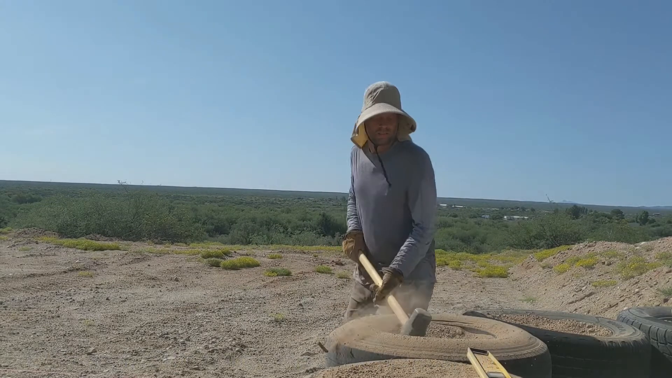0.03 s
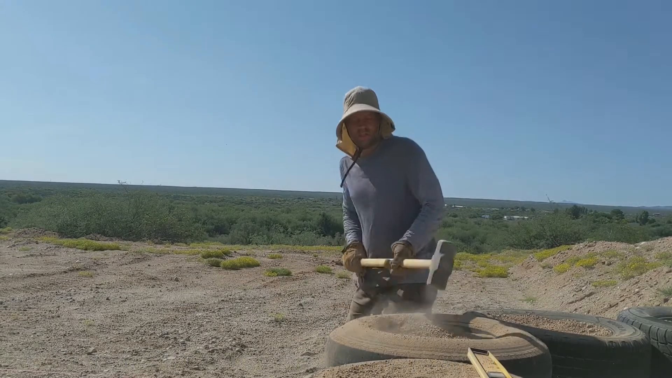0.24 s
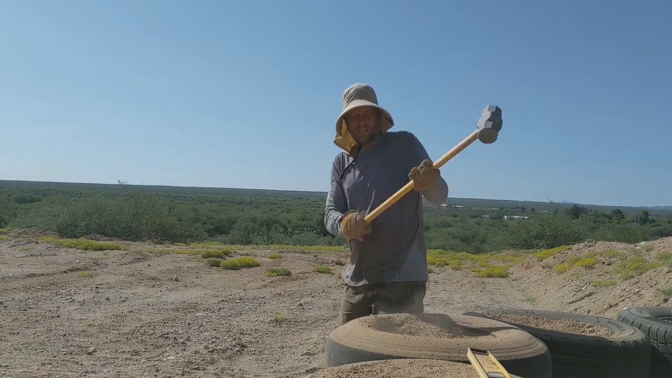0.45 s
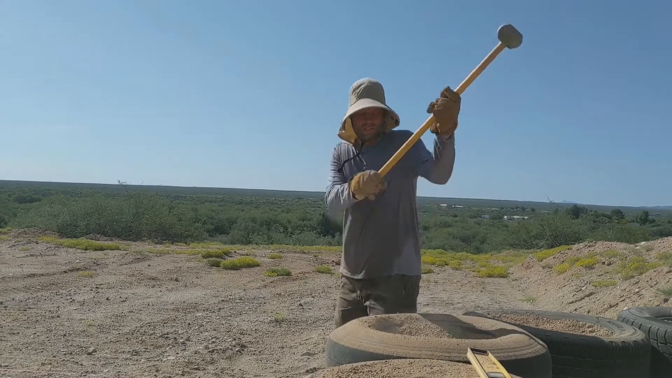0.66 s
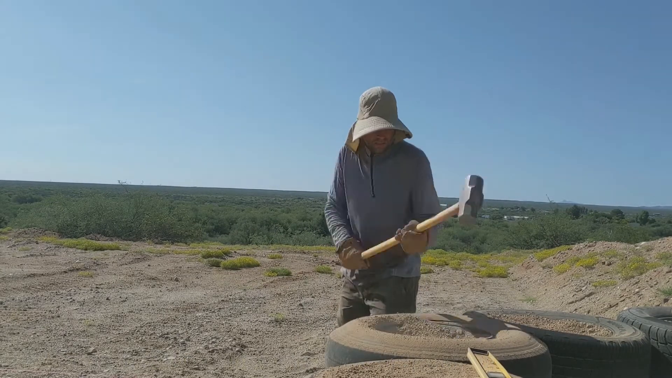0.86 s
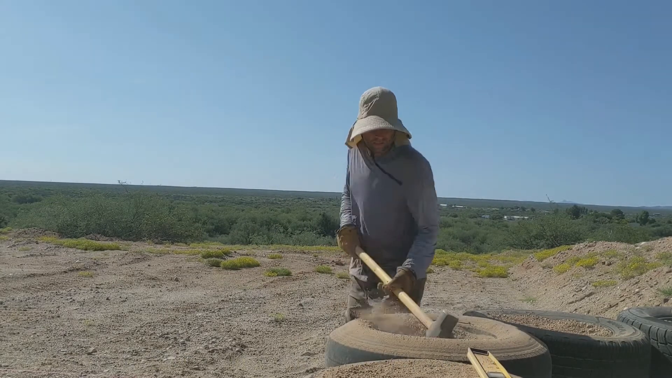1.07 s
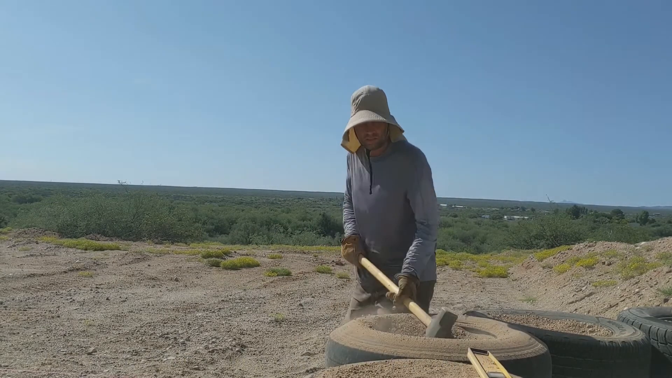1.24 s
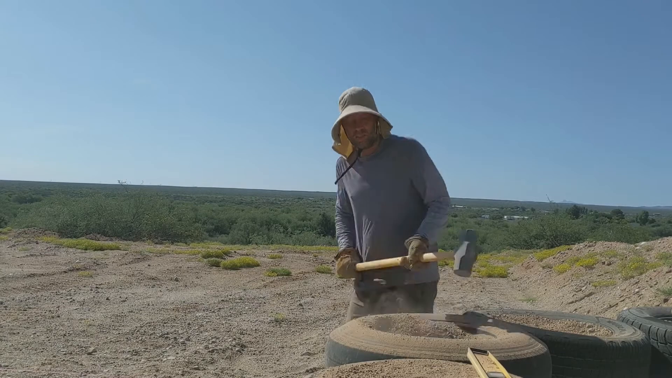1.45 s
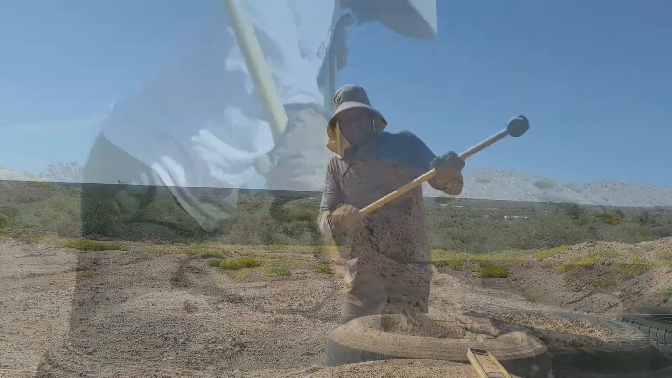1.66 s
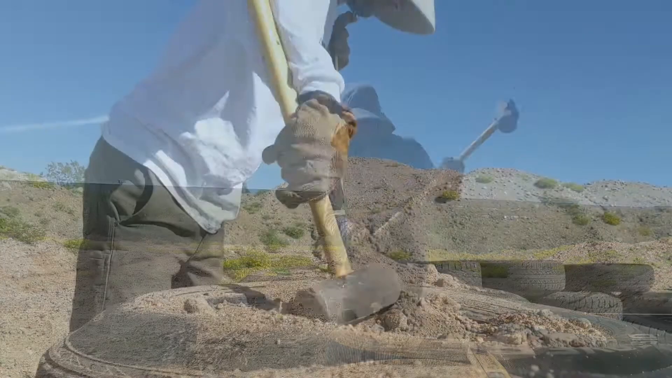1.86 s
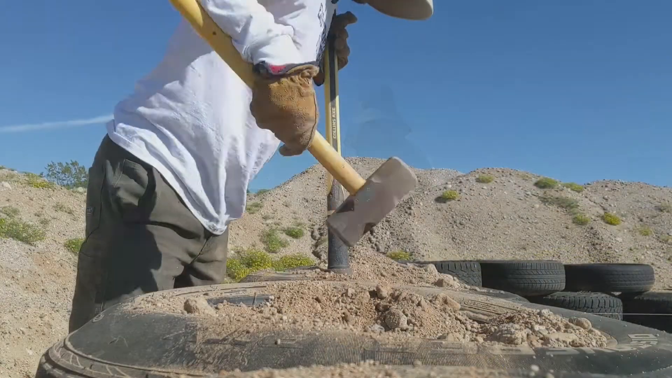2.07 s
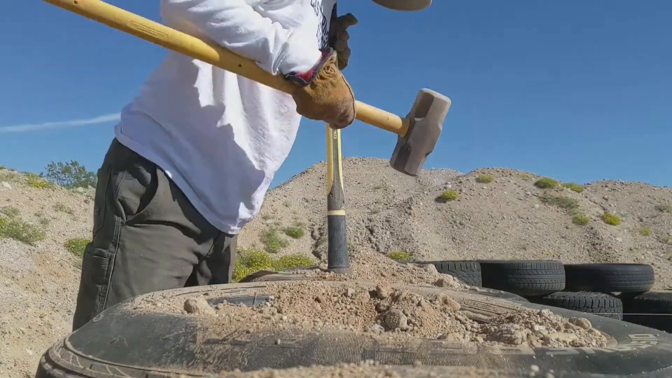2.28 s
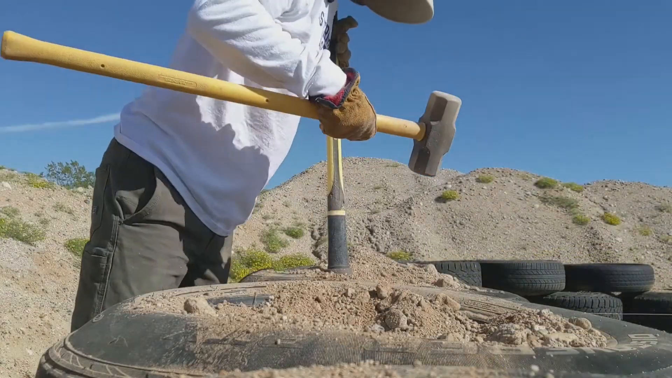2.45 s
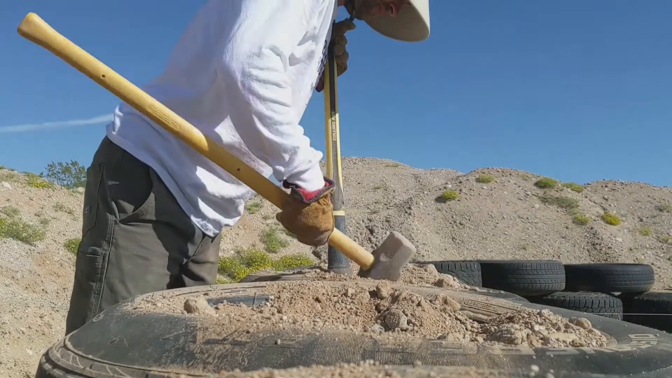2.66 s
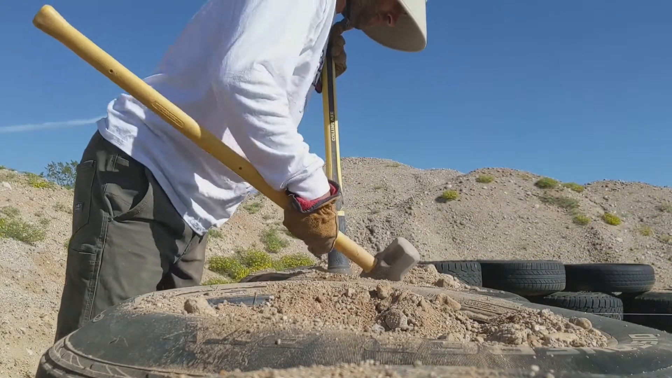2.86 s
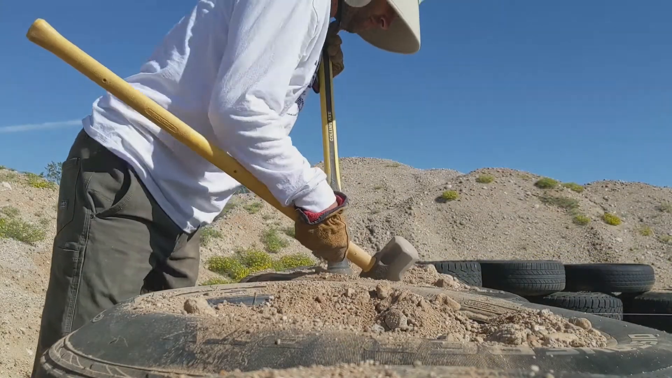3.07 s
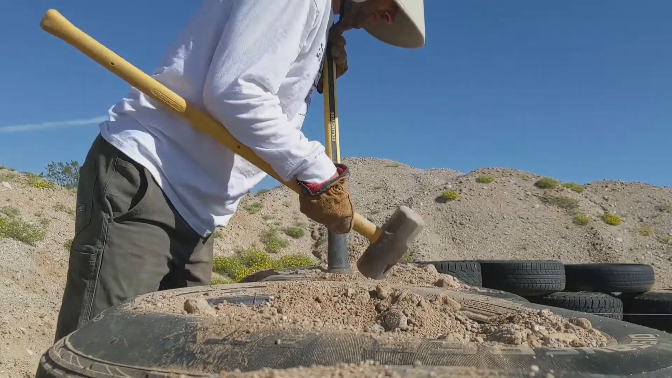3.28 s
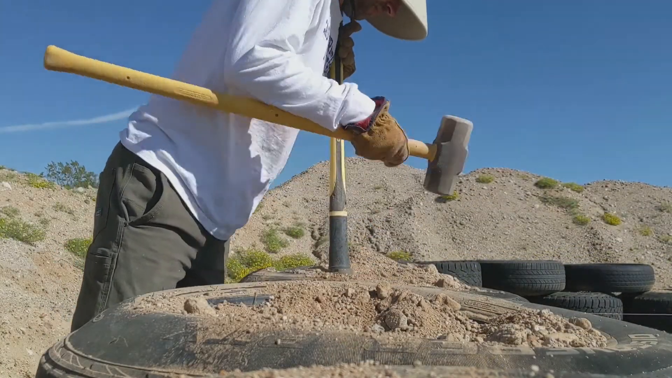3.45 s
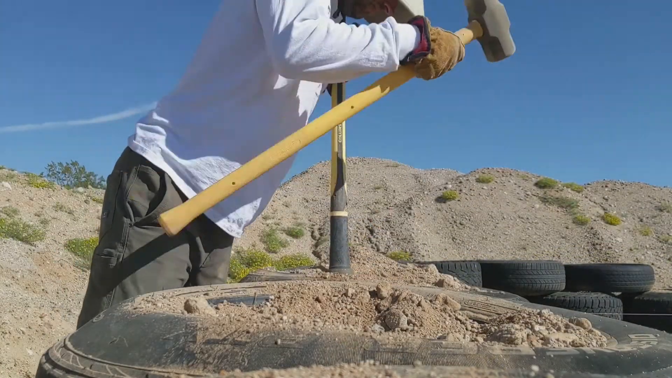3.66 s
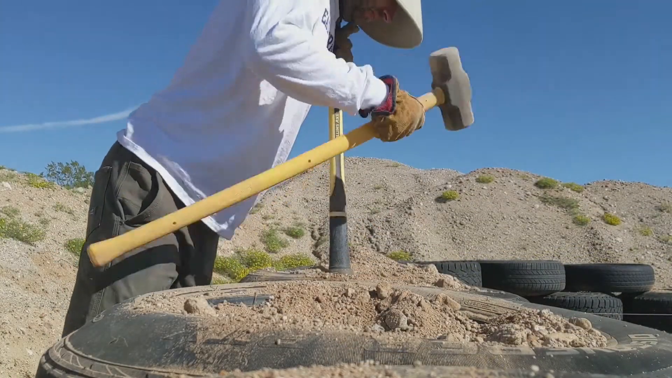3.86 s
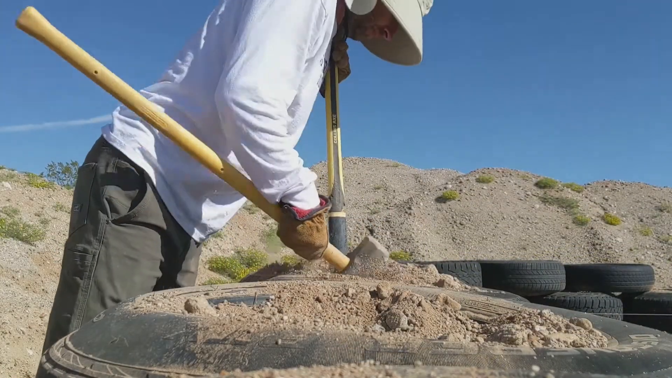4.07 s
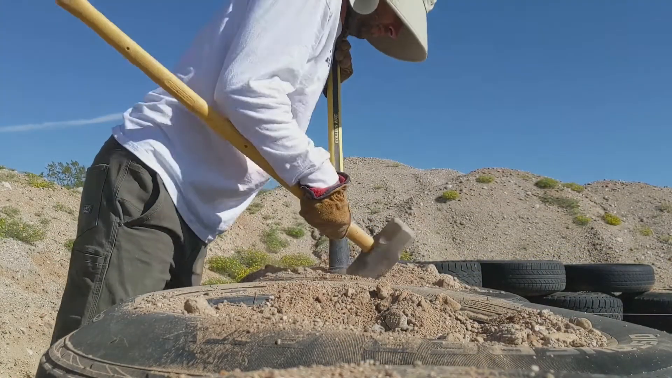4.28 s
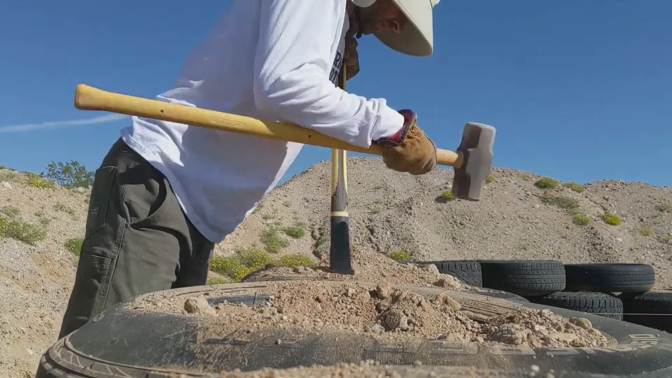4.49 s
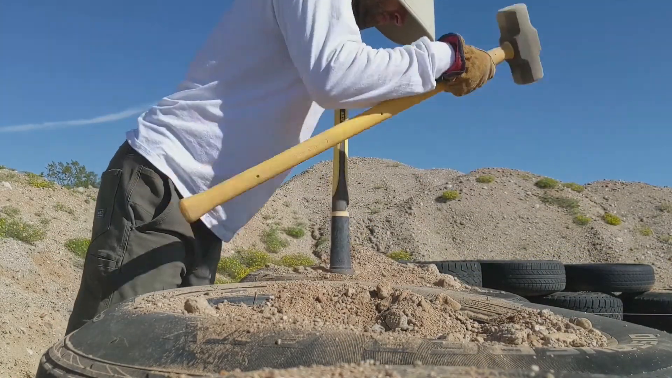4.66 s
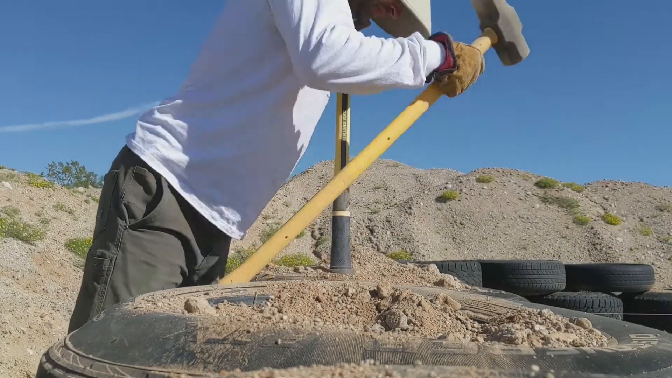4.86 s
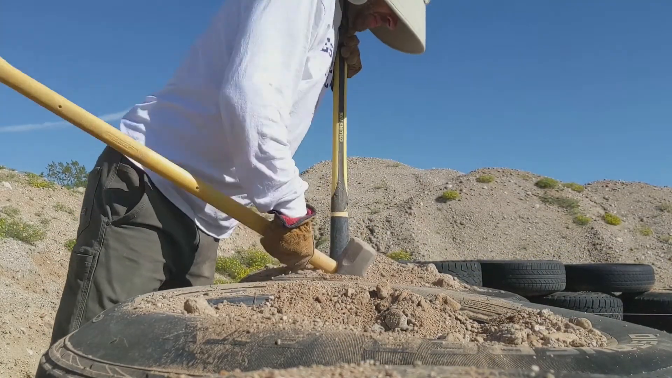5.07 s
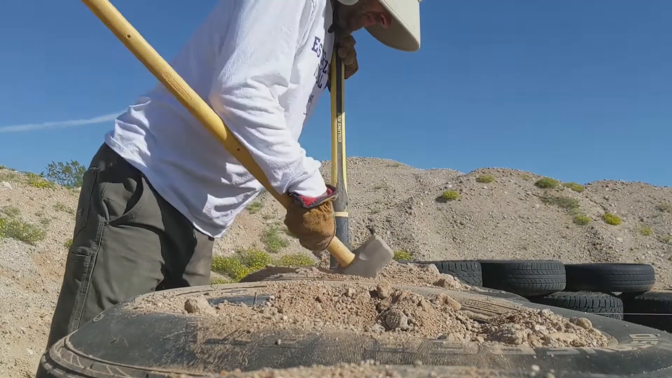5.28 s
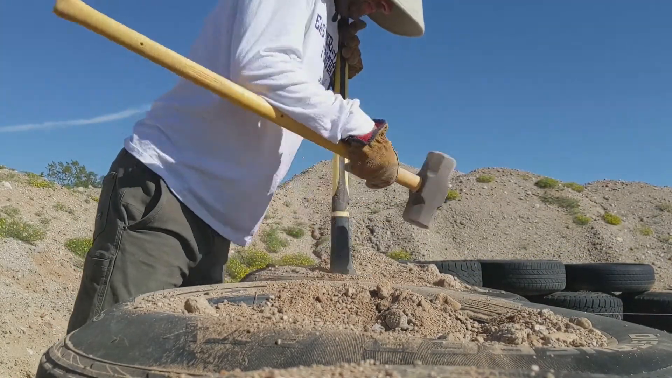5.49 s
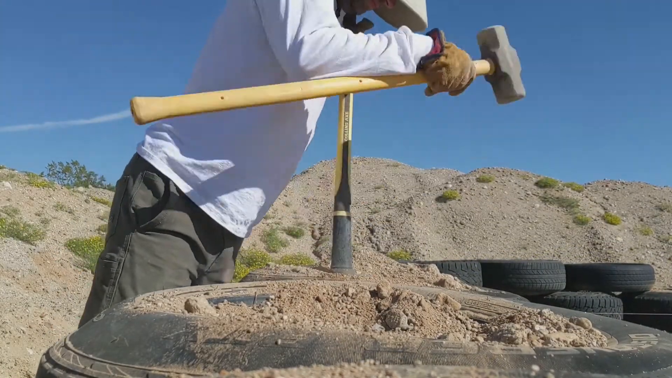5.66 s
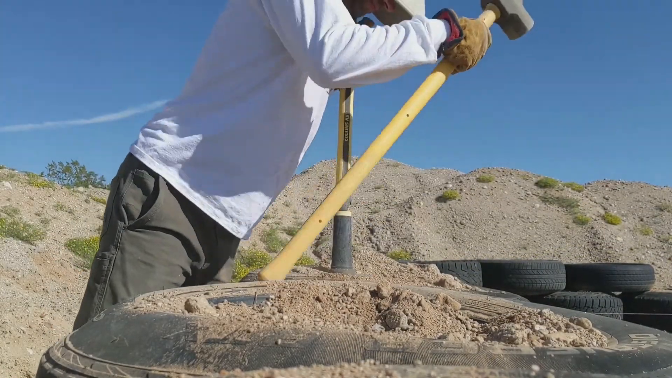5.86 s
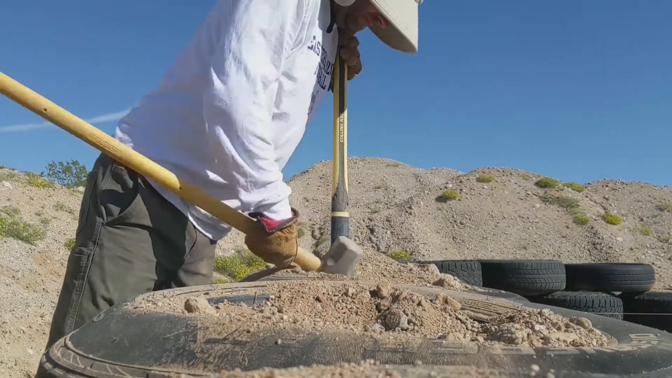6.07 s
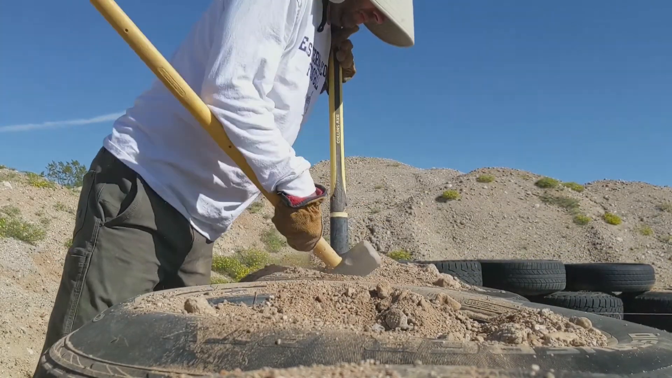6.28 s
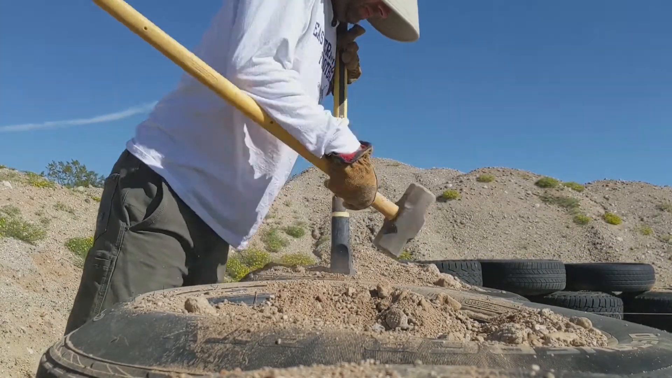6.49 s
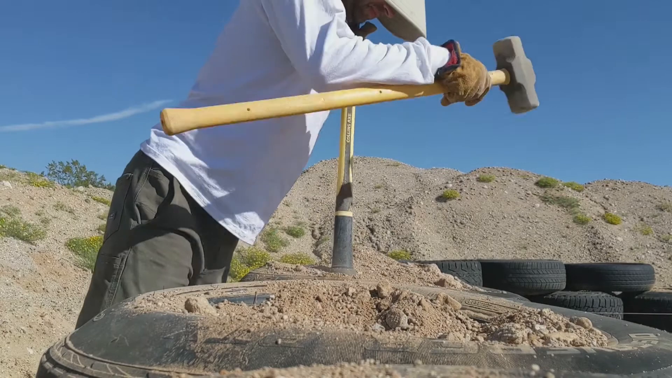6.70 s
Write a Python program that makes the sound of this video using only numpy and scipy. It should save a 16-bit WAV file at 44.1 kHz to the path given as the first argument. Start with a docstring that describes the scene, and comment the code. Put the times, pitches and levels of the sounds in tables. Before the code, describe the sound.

Outdoors, breeze rumbles softly on the microphone and a far engine drones low, with a few dull clods dropping in the first 0.7 s. At 1.0 s a sledgehammer lands on earth packed in a tyre: a deep, short, muffled thump. Around 1.75-2.1 s the engine disappears and the breeze drops; faint high whistles of a bird and small pebble knocks appear. Closer blows follow at 2.7, 4.0, 5.1 and 6.1 s. The first is a hard, dry stony knock with little boom; the next is sharp with weight beneath; the last two are full, deep thuds with gritty crunch. Soft hammer rebounds, crumbling dirt and pebble ticks follow them, while sleeves scuff and a glove hisses along the handle. Low, faint bird whistles return from 5.8 s. Blows are brighter at right, dry, without echo, over quiet distant site noise and hiss until 6.7 s.

```python
"""Sledgehammer ramming earth into tyres

Each blow crunches grit as filtered noise and rings stones, packed tyre, ground and steel head as decaying modes.
Clods and pebbles tick, cloth and glove rustle as shaped noise, and a bird whistles in gliding sines.
Breeze and a far engine's drone fade early, over far-off site noise and microphone hiss.
"""
import sys
import numpy as np
from scipy import signal
from scipy.fft import rfft, irfft, next_fast_len
from scipy.io import wavfile
from scipy.ndimage import uniform_filter1d

SR = 44100
rng = np.random.default_rng(int(sys.argv[2]) if len(sys.argv) > 2 else 0)


def bounce(signal):
    """Save signal as a 16-bit WAV file at the path given by the first command-line argument."""
    frames = np.transpose(np.atleast_2d(signal))
    limited = np.clip(frames, -1, 1)
    pcm = np.round(limited * 32767).astype(np.int16)
    wavfile.write(sys.argv[1], SR, pcm)


N = 296793  # samples

# Hammer blows: start_s, contact_ms, touch_ahead_ms, touch_db, ground_late_ms, ground_db, fill_db, tyre_db,
# stone_db, steel_db, steel_t60_s, grit_db, spray_db
BLOWS = [(1.0092, 0.76, 2.5, -67, 28, -29, -29.5, -24.5, -35.5, -70, .04, -51, -57),
         (2.6958, 0.39, 1.22, -19.5, 57.3, -39.5, -48.5, -35, -20, -34.5, 0.06, -47.5, -72),
         (4.0217, 0.38, 6.7, -50, 35, -38.5, -26, -44, -14, -68, .05, -41, -71.5),
         (5.0996, 1.2, 4.1, -27.5, 24, -28.5, -24.5, -24, -21.5, -38.5, 0.024, -47, -76),
         (6.1224, 0.92, 3.1, -27, 22, -30.5, -23, -21.5, -36, -34, 0.038, -46, -35)]


def blows():
    """Impact excitation: the head touches loose grit first, then pushes on everything that rings."""
    out, t = np.zeros(N), np.arange(N) / SR
    loose, crunch = loose_earth(), grit_noise(0.88, 0.83, 3800, 4000)
    spray, bands = grit_noise(0.1, 0.7, 11000, 7000), settling_bands()
    for (start, contact_ms, ahead_ms, touch_db, late_ms, ground_db, fill_db, tyre_db,
         stone_db, steel_db, steel_t60, grit_db, spray_db) in BLOWS:
        near = slice(int((start - .02) * SR), int((start + .6) * SR))
        since = t[near] - start
        early = since + ahead_ms / 1000
        # the struck face first moves away, so the pressure starts negative
        out[near] -= packed_tyre(since, fill_db, tyre_db, contact_ms)
        out[near] -= stones(since, stone_db, contact_ms)
        out[near] += db_to_gain(fill_db - 7) * loose[near] * fade(since, .15)
        out[near] += ground(since, late_ms, ground_db)
        out[near] += steel_head(since, steel_db, steel_t60)
        out[near] -= db_to_gain(touch_db) * soften(pebble(early, 0.0043), .1)
        out[near] += db_to_gain(grit_db) * crunch[near] * fade(early, 0.051)
        out[near] += db_to_gain(spray_db) * spray[near] * fade(since, 0.023)
        out[near] += settling(since, [band[near] for band in bands], grit_db)
    return out


# Modes of the earth fill: pitch_hz, level_db, t60_s
FILL = [(92, 3.5, 0.052), (146.6, 0.33, 0.075)]
# Modes of the tyre: pitch_hz, level_db, t60_s
TYRE = [(243, -2, 0.055), (321, -5, 0.061), (510, -13.5, 0.018), (615, 7, 0.0067)]


def packed_tyre(since, fill_db, tyre_db, contact_ms):
    """Modal resonance: earth fill and tyre boom, with fewer highs the longer the contact lasts."""
    fill = db_to_gain(fill_db) * ring(FILL, since)
    tyre = db_to_gain(tyre_db) * ring(TYRE, since)
    return soften(fill + tyre, contact_ms)


# Modes of the stones: pitch_hz, level_db, t60_s
STONE = [(824, 7.5, 0.0096), (1286, 4, 0.01015), (1416, -10.5, 0.029), (2750, 5, 0.0073),
         (4210, -26.5, .015), (5800, -24.5, 0.018)]


def stones(since, level_db, contact_ms):
    """Radiation efficiency: stones ring, but are too small to radiate bass."""
    small = signal.butter(2, 450, "high", fs=SR)
    return soften(db_to_gain(level_db) * signal.lfilter(*small, ring(STONE, since)), contact_ms)


# Modes of the ground: pitch_hz, level_db, t60_s
GROUND = [(29, 0, .13), (42, 0, .08), (64, -2, .1)]


def ground(since, late_ms, level_db):
    """Damped oscillation: the ground gives 8 ms after the blow, then swings harder later."""
    first = db_to_gain(-4.5) * ring(GROUND, since - 0.008)
    main = ring(GROUND, since - late_ms / 1000)
    return soften(db_to_gain(level_db) * (first + main), 14)


# Modes of the steel head: pitch_hz, level_db
STEEL = [(7110, -27), (8770, -13), (11370, -4.5), (12100, -18)]


def steel_head(since, level_db, t60):
    """Modal resonance: high steel modes share one decay and build up over 2.9 ms."""
    modes = [(*mode, t60) for mode in STEEL]
    return db_to_gain(level_db) * ring(modes, since) * np.clip(since / 0.0029, 0, 1)


def grit_noise(share, spread_db, hz, width):
    """Granular noise: collisions of uneven grains fill one broad band."""
    return unit(shape(grains(share, spread_db), peak(hz, width) ** 2))


def loose_earth():
    """Granular friction: the loose part of the fill shifts as low noise."""
    return grit_noise(0.072, 3, 150, 160)


# Bands of thrown earth: pitch_hz, level_db (re the blow's grit), t60_s
SETTLE = [(496, 9.5, 0.056), (1132, 1.5, 0.13), (2200, -13, 0.054), (3800, 0.5, 0.081), (7880, -18, 0.037),
          (13070, -26, 0.074)]


def settling_bands():
    """Granular noise: one band of grain collisions for each row of thrown earth."""
    return [grit_noise(0.22, 3.4, hz, 0.67 * hz) for hz, _, _ in SETTLE]


def settling(since, bands, grit_db):
    """Frequency-dependent decay: each band of thrown earth dies away at its own rate."""
    return sum(db_to_gain(grit_db + db) * band * fade(since, t60)
               for band, (_, db, t60) in zip(bands, SETTLE))


# Soft bounces of head and tyre: start_s, fill_db, tyre_db
BOUNCES = [(2.098, -54, -44), (2.795, -52, -70), (2.871, -56, -73), (3.449, -71, -41.5), (3.956, -75, -41),
           (4.114, -43, -56), (4.217, -48.5, -48), (4.351, -71.5, -45), (5.197, -48, -66),
           (5.299, -44.5, -75), (5.343, -51, -48), (6.213, -46.5, -57.5), (6.327, -46, -67),
           (6.382, -54, -71), (6.429, -50, -63)]


def bounces():
    """Elastic rebound: head and tyre bounce back softly, ringing the fill and tyre modes again."""
    out, t, loose = np.zeros(N), np.arange(N) / SR, loose_earth()
    for start, fill_db, tyre_db in BOUNCES:
        near = slice(int((start - .02) * SR), int((start + .2) * SR))
        since = t[near] - start
        out[near] -= packed_tyre(since, fill_db, tyre_db, contact_ms=4.8)
        out[near] -= db_to_gain(fill_db - 14.5) * loose[near] * fade(since, 0.27)
    return out


# Spectral shading of the left channel, which faces away from the work: pitch_hz, left_minus_right_db
SHADE = [(60, -.5), (200, -2.5), (400, -5.5), (700, -4), (1300, -1.5), (2400, -1.5), (4400, -8),
         (8000, -11), (11500, -19), (15000, -19)]
# Phase lag of the left channel: pitch_hz, lag_rad
LEFT_LAG = [(60, .05), (300, .6), (600, 0.4), (1300, .05), (2300, .05), (4000, 2.38), (16000, 11.7)]


def place_hits(hits):
    """Interaural-style cues: the blows reach the left duller and with a phase lag."""
    shade, lag = along(SHADE), np.exp(-1j * along(LEFT_LAG))
    left = shape(hits, db_to_gain(shade / 2) * lag)
    right = shape(hits, db_to_gain(-shade / 2))
    return np.array([left, right])


# Modes of a clod: pitch_hz (before detuning), level_db, t60_share (of the tick's t60)
CLOD = [(320, 2.5, 0.31), (477, -11, 2.2), (675, 0, 0.76), (800, 9.5, 0.43)]


def clod(since):
    """Modal resonance: a clod thuds dully through a soft contact."""
    return soften(knock(CLOD, since, t60=0.042), 1.89)


# Modes of a pebble: pitch_hz (before detuning), level_db, t60_share (of the knock's t60)
PEBBLE = [(1050, -6, .6), (1350, -6, .5), (1750, -8, .45), (2400, -14, .3), (3200, -13, .3),
          (4400, -15, .25), (5500, -20, .2)]


def pebble(since, t60):
    """Modal resonance: a pebble knocks brighter than a clod."""
    return knock(PEBBLE, since, t60)


# Falling clods and pebbles: start_s, clod_db, pebble_db, grit_db, left_minus_right_db (clod and pebble)
TICKS = [(0.106, -62, -56, -76, 2), (0.138, -43.5, -54, -76, 4), (0.552, -45.5, -72, -72, -2),
         (0.579, -48, -52.5, -74, 9.5), (0.644, -40, -67, -74, -4), (1.3, -49.5, -61, -73, 1.5),
         (1.908, -68, -53, -73, -4), (1.984, -66, -46.5, -72, -2), (2.003, -70, -50, -72, -3),
         (2.098, -49, -41.5, -46, -2), (3.422, -52, -76, -73, -3), (3.489, -43, -41, -56, -3),
         (3.583, -47.5, -52.5, -60, 2), (4.121, -53, -55, -62, -8), (4.165, -48, -72, -71, -3),
         (4.581, -46, -54, -72.5, -6), (4.712, -61, -54, -73, -4), (5.274, -66, -49.5, -36.5, 1),
         (5.318, -44.5, -57, -72, 9), (5.77, -63, -59, -54, 2.5), (6.194, -63.5, -54.5, -69, -5),
         (6.325, -55, -48.5, -35.5, -4), (6.38, -80, -88, -43, -6), (6.507, -46, -62, -72, -3),
         (6.547, -46.5, -75, -73, 3), (6.627, -55, -48, -69, 1), (6.644, -62, -54.5, -71, 1)]


def ticks():
    """Superposed impacts: clod thuds, pebble knocks and grit clicks."""
    out, since = np.zeros((2, N + 4096)), np.arange(4096) / SR - .002
    for start, clod_db, pebble_db, grit_db, pan_db in np.vstack([TICKS, stray_ticks()]):
        dull = db_to_gain(clod_db) * clod(since)
        bright = db_to_gain(pebble_db) * soften(pebble(since, t60=0.042), .15)
        sharp = np.diff(rng.standard_normal(4096), prepend=0)  # differencing lifts the treble
        click = db_to_gain(grit_db) * sharp * fade(since, 0.0049)
        i = int((start - .002) * SR)
        out[:, i:i + 4096] += (dull + bright) * db_to_gain([[pan_db / 2], [-pan_db / 2]])
        out[:, i:i + 4096] += click * db_to_gain([[-10], [0]])
    return out[:, :N]


def stray_ticks(count=30):
    """Random point process: stray ticks fall at chance times, louder where something scuffs."""
    when = .01 + rng.random(count) * (N / SR - .02)
    luck = rng.standard_normal((count, 4))
    near_db = 20 * np.log10(scuff_gain()[(when * SR).astype(int)]) + 10.5
    levels_db = near_db[:, None] + [0, -11, -16] + 6.5 * luck[:, :3]  # clod, pebble, grit
    return np.column_stack([when, levels_db, 3 * luck[:, 3]])


# Scuffs of sleeves, boots and loose earth: start_s, hold_s, level_db
SCUFFS = [(.12, 0.068, -70), (.5, 0.099, -70.5), (1.89, 0.15, -64), (2.76, 0.27, -68.5), (3.38, 0.21, -67),
          (3.97, 0.14, -64), (4.15, 0.15, -67.5), (4.58, 0.35, -68), (4.92, .12, -64.5),
          (5.31, 0.014, -68.5), (5.62, 0.034, -71), (6.19, 0.55, -70), (6.53, 0.24, -65)]


def scuff_gain():
    """Amplitude envelope: scuffs rise, hold and fall away."""
    return swells(SCUFFS, rise_db_s=128, fall_db_s=86.5)


# Relative spectrum of the scuffs: pitch_hz, density_db_per_hz
SLEEVE = [(150, -7.5), (300, 1), (600, 8.5), (1200, -4), (1700, -6.5), (2100, -23.5), (3500, -11),
          (6000, -26)]


def scuffs():
    """Friction noise: rubbing surfaces catch and release as uneven grains."""
    mid, side = [unit(shape(grains(.05, 2.5), db_to_gain(along(SLEEVE)))) for _ in range(2)]
    pair = mid + 0.6 * side * np.array([[1], [-1]])
    return pair * scuff_gain() * db_to_gain(2.1 * walk(25))


# Relative spectrum of the glove: pitch_hz, width_hz, level_db
GLOVE = [(3270, 800, -1.5), (5510, 500, 4.5), (8000, 11000, -11.5), (11870, 880, -2.5), (14300, 1600, -15)]
# Slides of the glove along the handle: start_s, hold_s, level_db
SLIDES = [(1.75, 0.45, -84), (2.78, 0.3, -77.5), (3.27, 0.046, -83), (4.07, 0.11, -76),
          (4.66, 0.092, -74.5), (4.9, 0.11, -69)]


def glove():
    """Friction noise: the glove hisses along the handle, mostly at the right."""
    hiss = band_noise(GLOVE) * db_to_gain(0.4 * walk(20))
    rest = db_to_gain(-83)  # faint hiss throughout
    hiss = hiss * (rest + swells(SLIDES, rise_db_s=114, fall_db_s=134))
    return hiss * db_to_gain([[-12], [3]])


# Bird notes: start_s, length_s, first_pitch_hz, last_pitch_hz, level_db (mid-note, before panning)
BIRD = [(1.75, .14, 4630, 4580, -77.5), (1.85, .15, 4200, 3660, -76), (2.2, .075, 4080, 3900, -79.5),
        (5.77, .15, 1500, 1570, -79), (5.93, .18, 1720, 1520, -79), (6.31, .06, 1400, 1300, -77)]


def bird():
    """Frequency modulation: thin, unsteady whistles glide evenly and swell in the middle."""
    out, t = 0, np.arange(N) / SR
    for start, length, first_hz, last_hz, db in BIRD:
        part = np.clip((t - start) / length, 0, 1)
        hz = (first_hz + (last_hz - first_hz) * part) * (1 + .007 * walk(200))
        swell_db = -6 * (2 * part - 1) ** 2
        gain = (part > 0) * (part < 1) * db_to_gain(db + swell_db + 2 * walk(60))
        out = out + gain * np.sin(2 * np.pi * np.cumsum(hz) / SR)
    return out * db_to_gain([[-10], [1]])


# Relative spectrum of breeze and rumble: pitch_hz, density_db_per_hz
BREEZE = [(12, -7.5), (26, 12), (45, -7.5), (80, -17.5), (160, -24), (300, -58.5)]
# Breeze on the microphone: time_s, level_db
GUSTS = [(0.0, -45), (0.11, -49), (0.3, -47.5), (0.71, -51.5), (1.25, -48.5), (1.78, -52), (2.02, -60.5),
         (2.5, -63), (3.3, -63), (3.65, -66.5), (3.8, -59.5), (3.94, -69.5), (4.8, -70), (6.0, -71.5),
         (6.73, -66)]
# Ground rumbling on after blows: start_s, level_db
RUMBLES = [(2.8, -61), (4.09, -48), (5.2, -48.5), (6.2, -44)]


def breeze_and_rumble():
    """Low-frequency noise: buffeting breeze and ground rumble, nearly alike in both channels."""
    mid, side = [unit(shape(rng.standard_normal(N), db_to_gain(along(BREEZE)))) for _ in range(2)]
    pair = (mid + 0.14 * side * np.array([[1], [-1]])) * db_to_gain(0.74 * walk(2.3))
    rumble = swells([(s, 0, db) for s, db in RUMBLES], rise_db_s=150.5, fall_db_s=45)
    return pair * np.hypot(db_to_gain(curve(GUSTS)), rumble)


# Noise bands of the far engine: pitch_hz, width_hz, level_db (relative)
ENGINE = [(88, 10, -9), (157.9, 9, -6.5), (181.1, 10, -12), (281, 16, -14), (371, 14, -16),
          (609.5, 12, -18)]
# Steadier tones of the far engine: pitch_hz, level_db (re the noise bands)
HUM = [(89.5, -1.), (181., -2.5)]
# Fading of the far engine: time_s, level_db
DRONE = [(0, -65.5), (.8, -64.5), (1.6, -65), (1.85, -69), (2.1, -90), (6.73, -100)]


def engine():
    """Narrow-band noise and tones: a far engine drones, with a slight shared drift in its tones."""
    turns = np.cumsum(1 + .004 * walk(3.5)) / SR
    hum = sum(db_to_gain(db + 1.3 * walk(6.6)) * np.sin(2 * np.pi * hz * turns) for hz, db in HUM)
    return (band_noise(ENGINE) + hum) * db_to_gain(curve(DRONE))


# Likeness of the site noise in the two channels: pitch_hz, correlation (-1 to 1)
LIKENESS = [(60, .9), (130, 0.83), (290, -0.55), (640, -0.63), (1400, 0.74), (3000, -0.13), (16000, -0.15)]
# Stereo balance of the site noise: pitch_hz, left_minus_right_db
SITE_LEAN = [(60, 0.5), (200, -1.5), (500, 3), (1300, 2), (8000, 2), (15000, -5.5)]
# Relative spectrum of the site noise: pitch_hz, density_db_per_hz
SITE = [(40, -4), (100, -12.5), (200, -18.5), (330, -13.5), (550, -7.5), (750, -18.5), (1500, -32),
        (2000, -34), (3200, -29), (6500, -34.5), (7600, -30.5), (9500, -33.5), (11000, -42.5),
        (16000, -47.5)]


def site():
    """Partly coherent diffuse noise: far-off site and hiss, each octave band flickering alone."""
    like, lean = np.clip(along(LIKENESS), -1, 1), along(SITE_LEAN)
    size = next_fast_len(N)
    mid = rfft(rng.standard_normal(size)) * np.sqrt(1 + like)
    side = rfft(rng.standard_normal(size)) * np.sqrt(1 - like)
    pair = np.array([(mid + side) * db_to_gain(lean / 2), (mid - side) * db_to_gain(-lean / 2)])
    pair = pair * db_to_gain(along(SITE))
    out = 0
    for octave in range(5, 15):  # bands centred on 2 ** octave Hz
        share = np.cos(np.pi / 2 * np.clip(np.log2(bins()) - octave, -1, 1)) ** 2
        flicker_db = walk(1.2) / octave  # smaller in higher bands
        out = out + irfft(pair * share, size)[:, :N] * db_to_gain(flicker_db)
    return unit(out) * db_to_gain(-60.5)


def db_to_gain(db):
    """Decibel scale: amplitude ratio of a level."""
    return 10 ** (np.asarray(db) / 20)


def unit(x):
    """Root mean square: scale a signal to rms 1."""
    return x / np.sqrt(np.mean(x ** 2))


def bins():
    """Discrete spectrum: frequency of every FFT bin in Hz, kept above zero."""
    return np.arange(next_fast_len(N) // 2 + 1) * SR / next_fast_len(N) + 1


def along(points):
    """Logarithmic frequency: read (Hz, value) points at every FFT bin."""
    hz, value = np.transpose(points)
    return np.interp(np.log(bins()), np.log(hz), value)


def shape(x, gain):
    """Linear filtering: multiply the spectrum by a gain for each FFT bin."""
    return irfft(rfft(x, next_fast_len(N)) * gain, next_fast_len(N))[..., :N]


def peak(hz, width):
    """Resonance curve: gain of one damped resonance at every FFT bin."""
    f = bins()
    return 1 / np.sqrt(1 + ((f - hz * hz / f) / width) ** 2)


def band_noise(table):
    """Resonant filtering: white noise through a sum of peaks, scaled to rms 1."""
    colour = sum(db_to_gain(db) * peak(hz, width) ** 2 for hz, width, db in table)
    return unit(shape(rng.standard_normal(N), colour))


def curve(table):
    """Linear interpolation: read (s, level) points at every sample."""
    s, level = np.transpose(table)
    return np.interp(np.arange(N) / SR, s, level)


def walk(rate):
    """Smoothed random process: levels held 1 / rate s, averaged twice; spread near 1."""
    k = int(SR / rate)
    held = np.repeat(rng.standard_normal(N // k + 3), k)
    return 1.99 * uniform_filter1d(uniform_filter1d(held, k), k)[k:N + k]


def grains(share, spread_db):
    """Sparse noise: a share of the samples are grains of uneven size; rms 1."""
    size = db_to_gain(spread_db * np.minimum(rng.exponential(size=N), 4))
    return unit(rng.standard_normal(N) * (rng.random(N) < share) * size)


def fade(since, t60):
    """Exponential decay: zero before the start, then a fall of 60 dB in t60 seconds."""
    return (since >= 0) * db_to_gain(-60 * np.clip(since, 0, None) / t60)


def ring(modes, since):
    """Modal superposition: decaying swings that start at full pressure."""
    return sum(db_to_gain(db) * fade(since, t60) * np.cos(2 * np.pi * hz * since)
               for hz, db, t60 in modes)


def soften(x, contact_ms):
    """Contact time: a softer contact is a longer push with fewer highs."""
    push = np.hanning(int(contact_ms * SR / 1000) + 3)
    return np.convolve(x, push / push.sum(), "same")


def knock(modes, since, t60):
    """Modal variation: a small loose thing rings a little differently every time."""
    detune = 1 + .08 * rng.standard_normal(len(modes))
    return ring([(hz * d, db, share * t60) for (hz, db, share), d in zip(modes, detune)], since)


def swells(rows, rise_db_s, fall_db_s):
    """Energy summation: (s, hold s, dB) events rise, hold and fall, added as power."""
    t, power = np.arange(N) / SR, 0
    for start, hold, db in rows:
        rise_db = rise_db_s * np.clip(start - t, 0, 2)
        fall_db = fall_db_s * np.clip(t - start - hold, 0, 2)
        power = power + db_to_gain(db - rise_db - fall_db) ** 2
    return np.sqrt(power)


def scene():
    """Superposition: all sources add as pressure in two channels."""
    hits = place_hits(blows() + bounces())
    handling = scuffs() + glove()
    open_air = breeze_and_rumble() + engine()
    return hits + ticks() + handling + bird() + open_air + site()


def record(dry):
    """Band limiting: a steep elliptic low-pass cuts the sound above 16 kHz."""
    return signal.sosfilt(signal.ellip(10, .2, 80, 16000, fs=SR, output="sos"), dry)


dry = scene()
out = record(dry)
bounce(out)
```